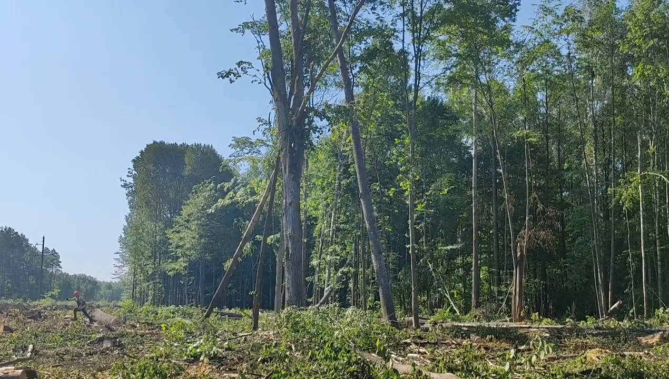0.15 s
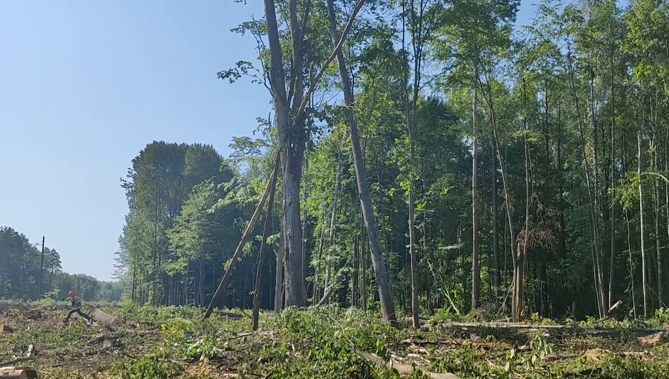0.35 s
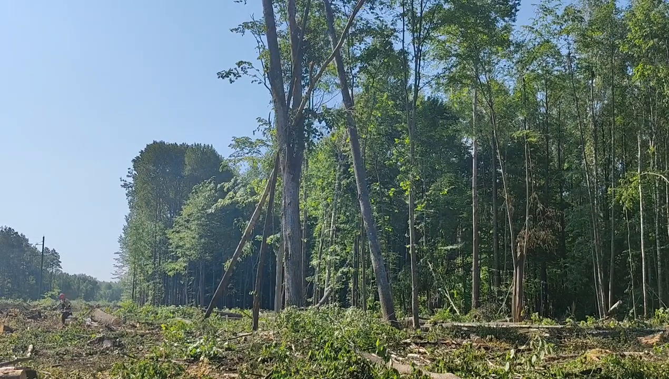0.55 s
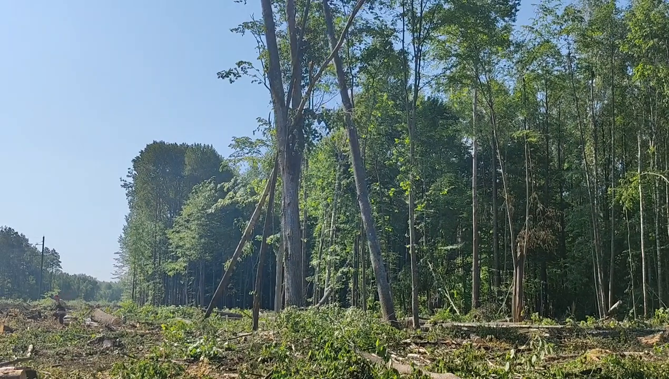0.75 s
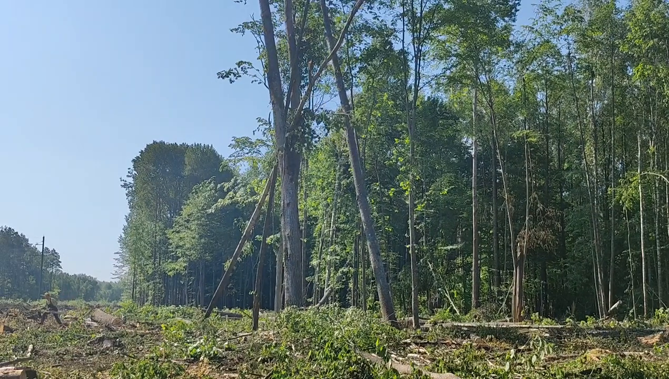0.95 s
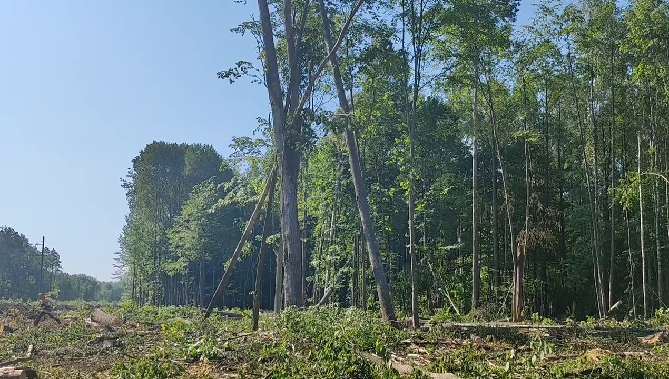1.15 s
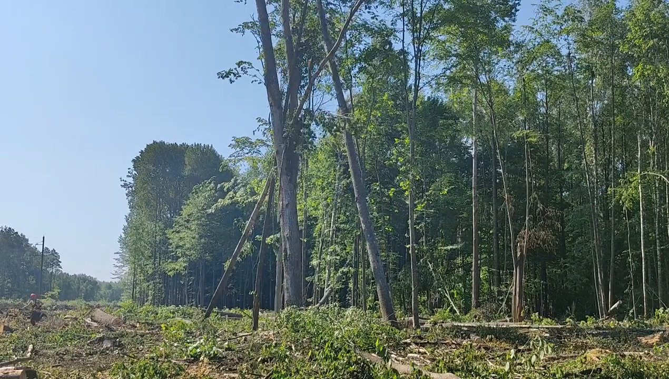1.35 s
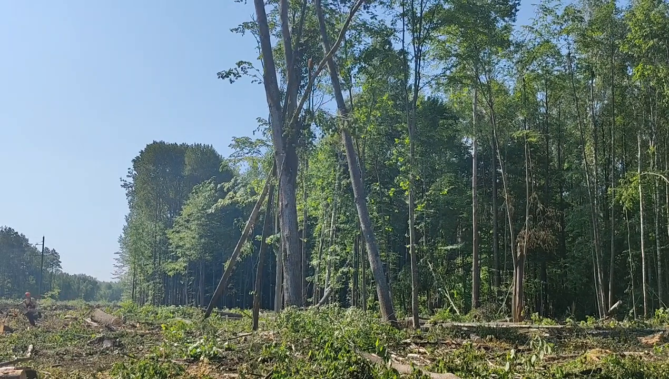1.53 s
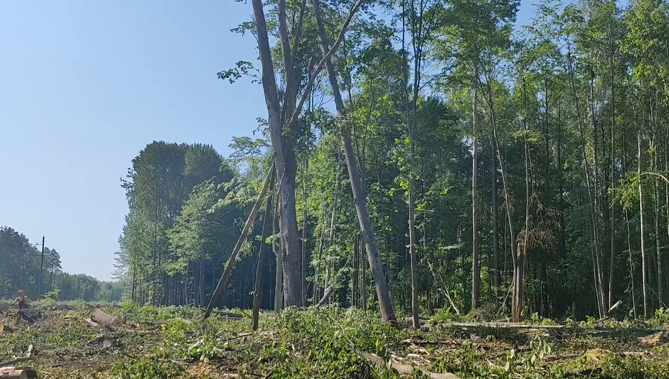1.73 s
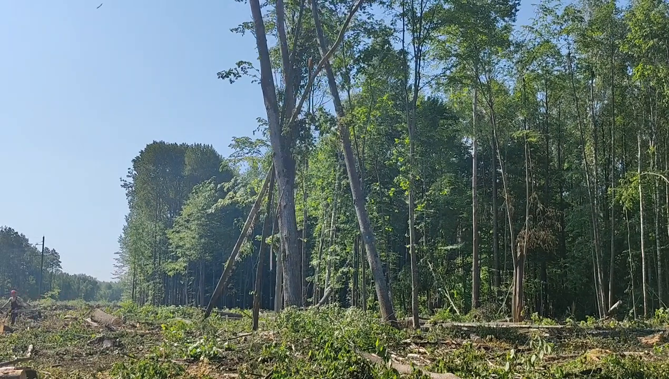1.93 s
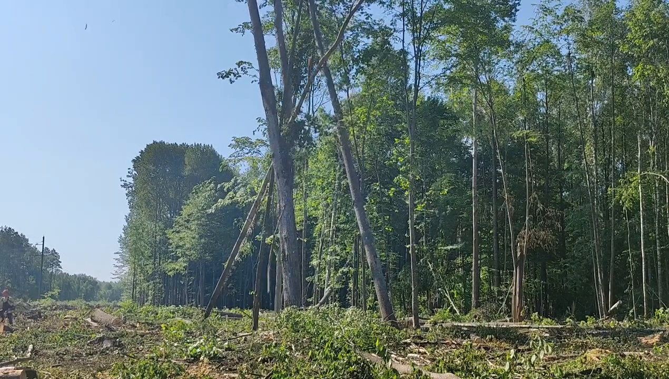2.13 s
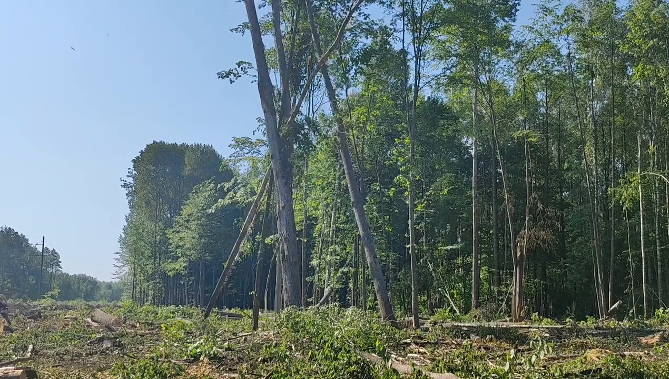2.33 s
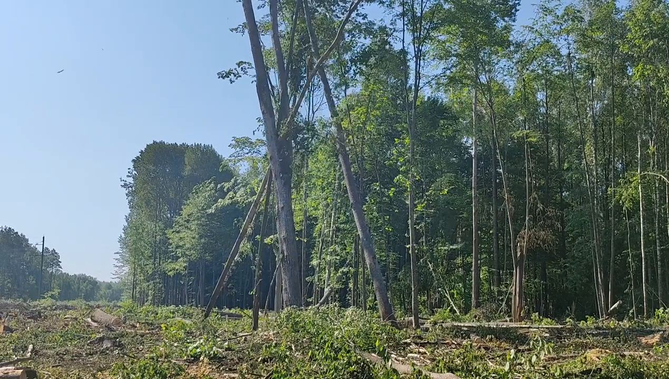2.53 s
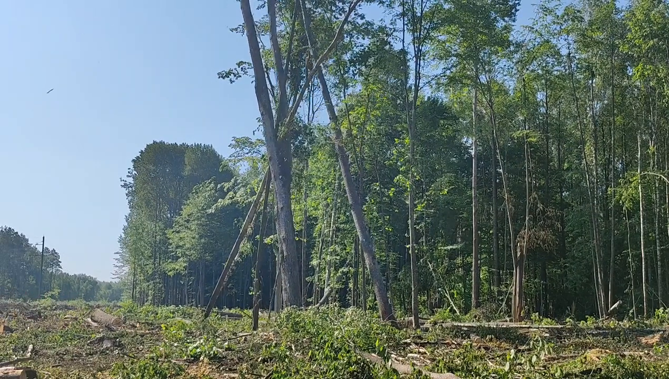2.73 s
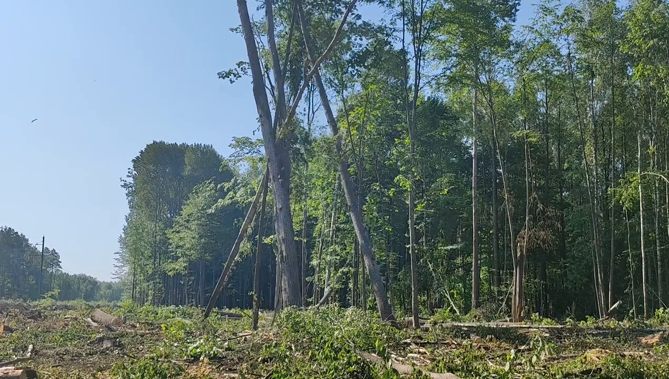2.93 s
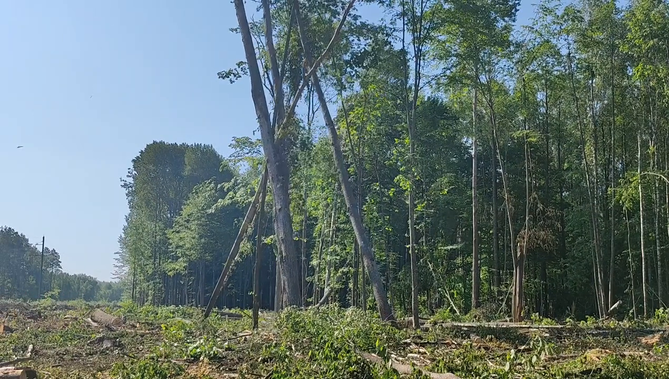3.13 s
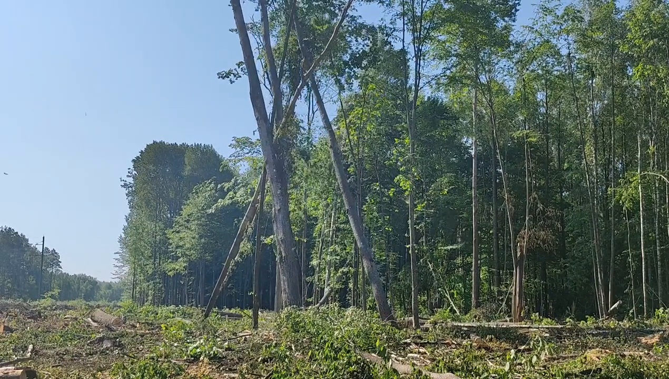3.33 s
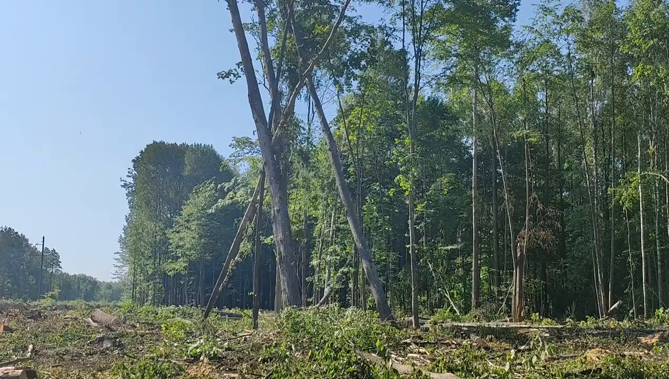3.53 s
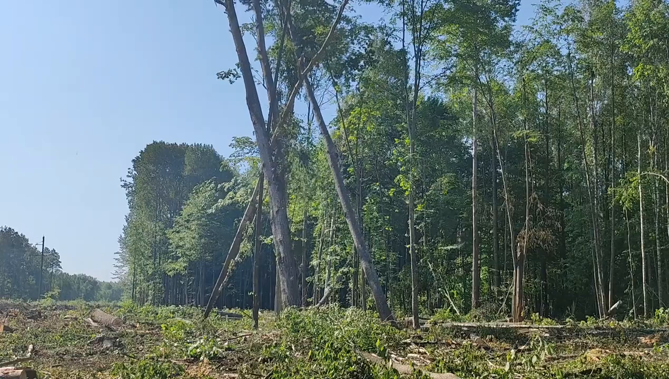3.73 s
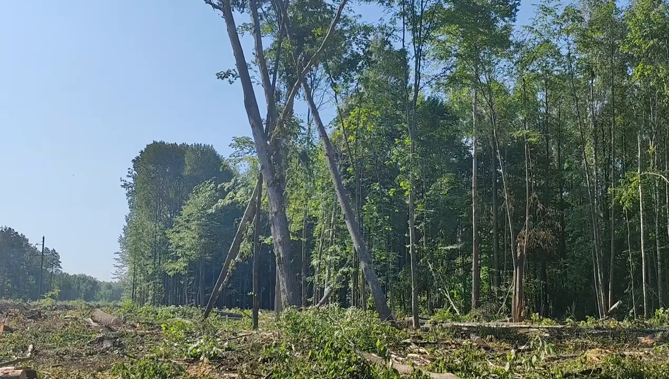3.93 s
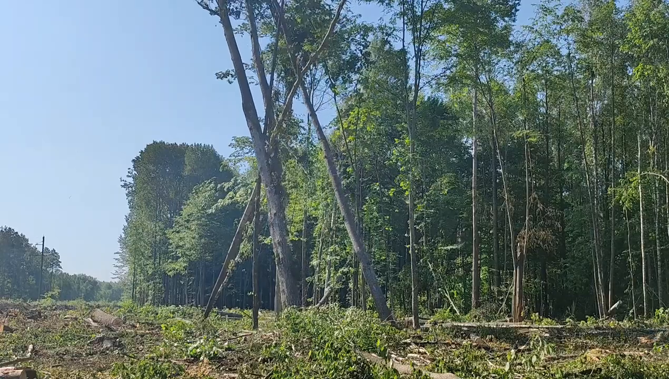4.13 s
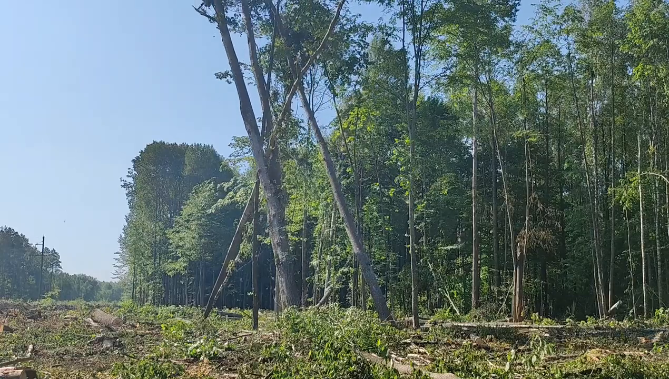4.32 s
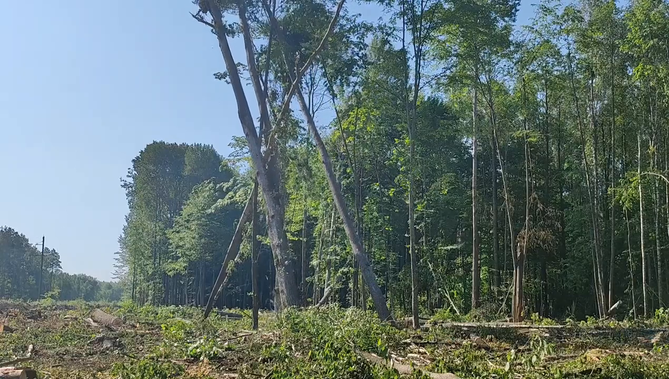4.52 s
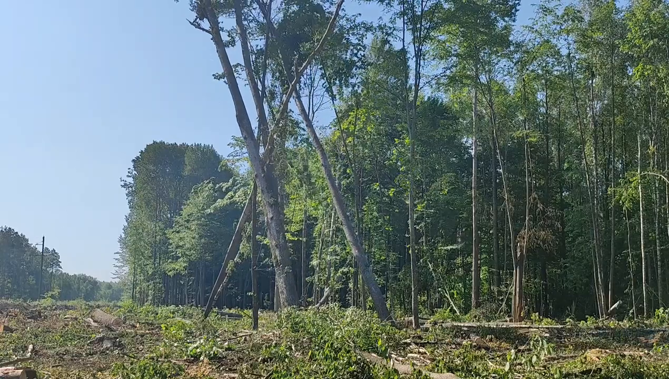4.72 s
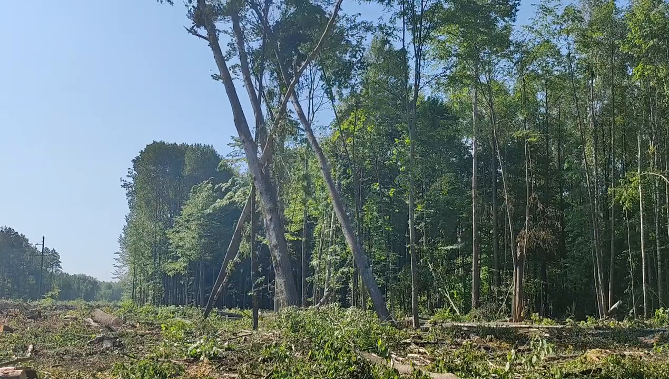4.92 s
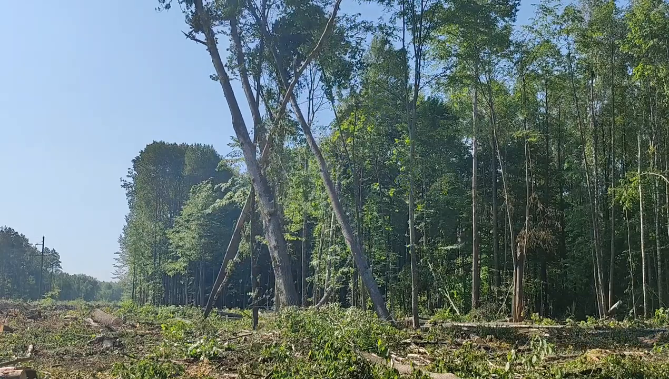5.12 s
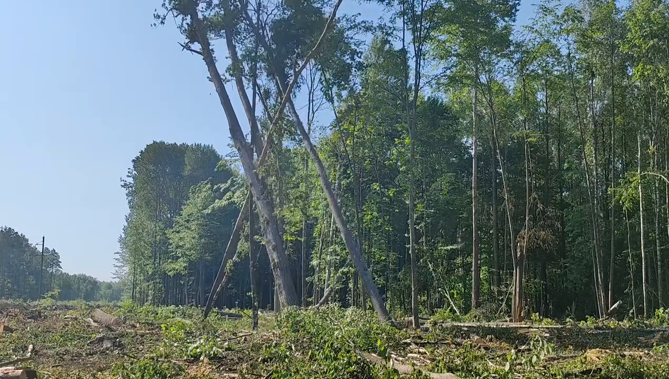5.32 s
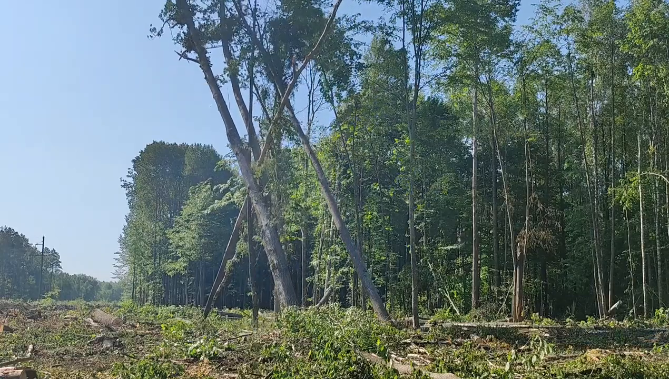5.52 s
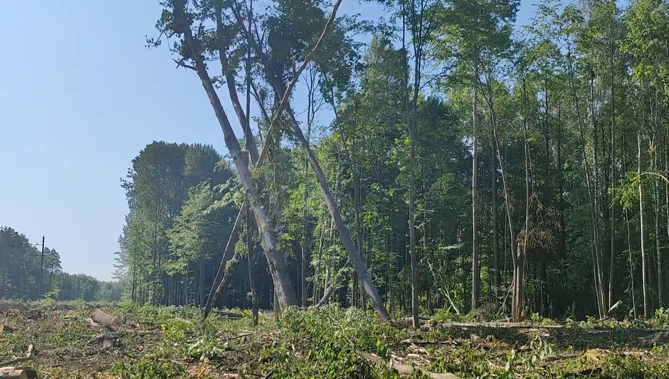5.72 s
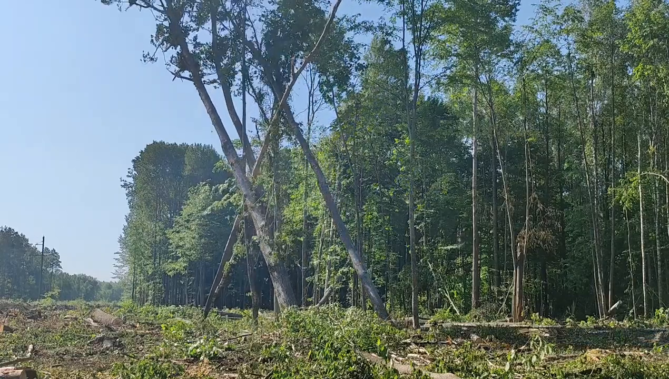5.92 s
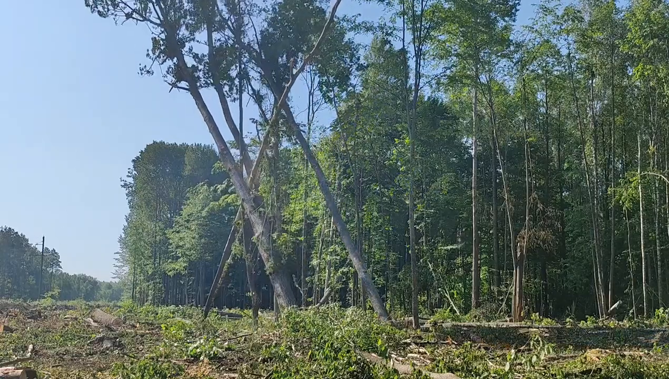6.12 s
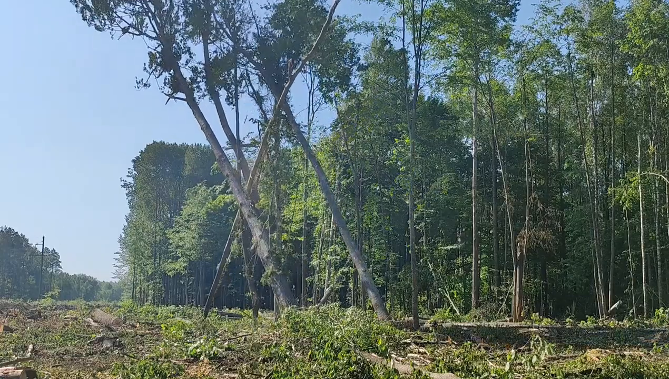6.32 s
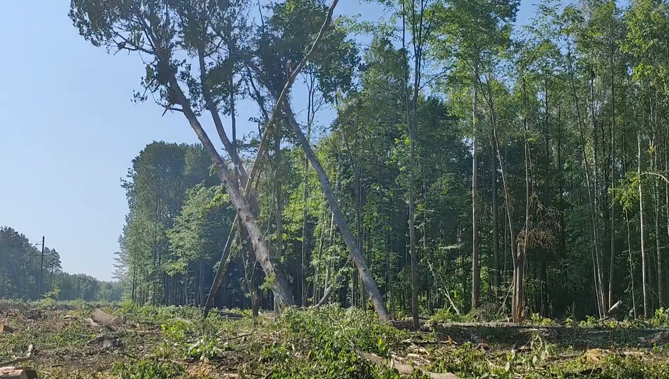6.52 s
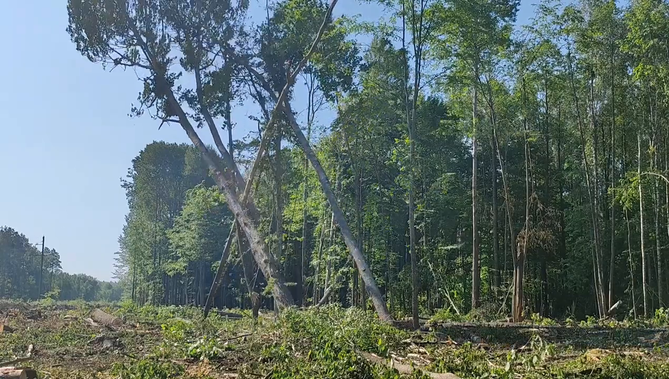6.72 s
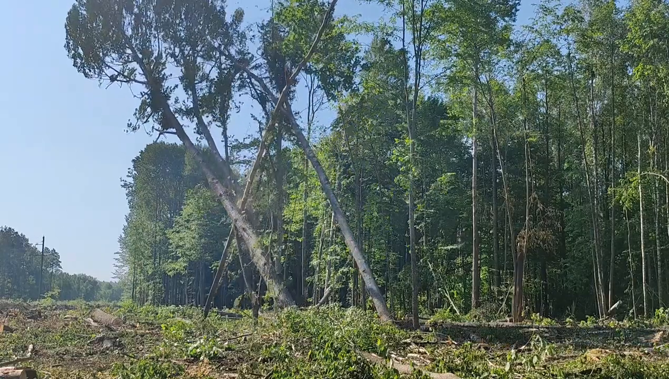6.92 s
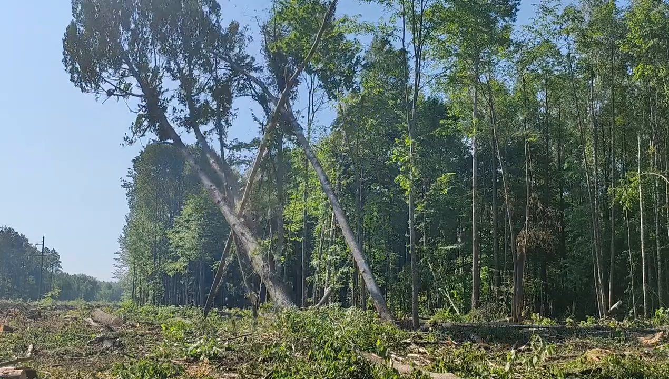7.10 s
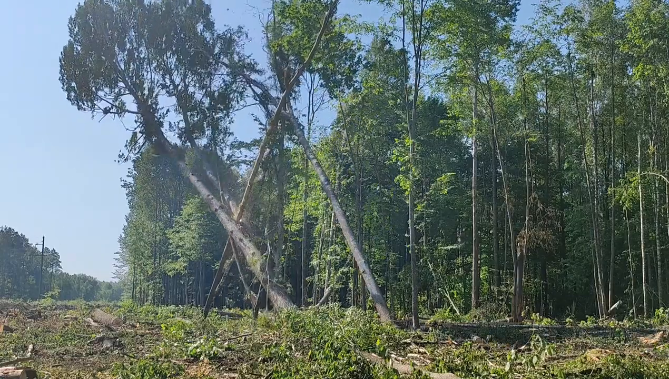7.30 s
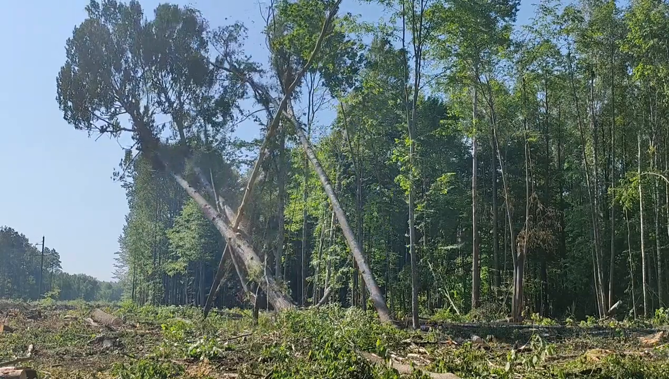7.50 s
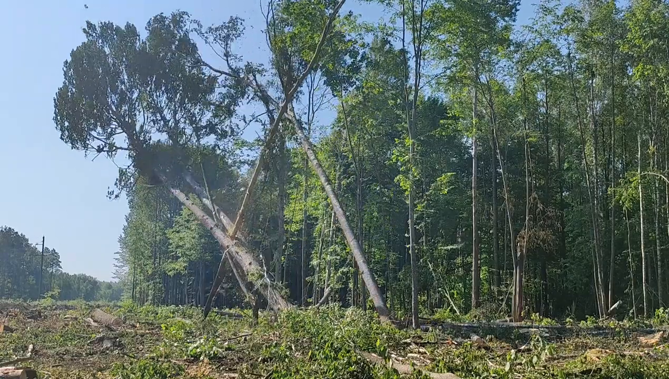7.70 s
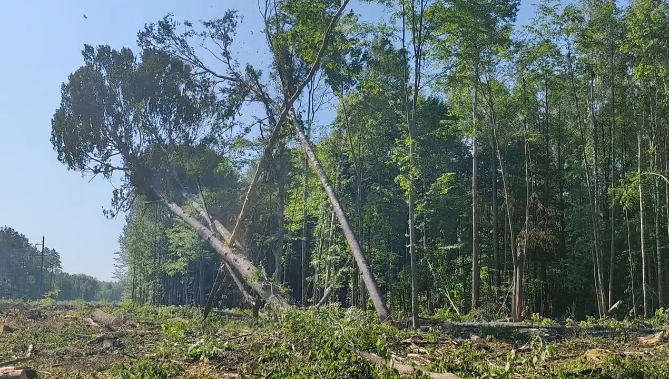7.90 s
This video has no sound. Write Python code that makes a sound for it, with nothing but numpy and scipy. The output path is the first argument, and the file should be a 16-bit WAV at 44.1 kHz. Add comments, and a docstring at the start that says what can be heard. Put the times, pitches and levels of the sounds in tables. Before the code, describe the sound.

A cut tree tips in a forest clearing, heard from some distance in stereo and slowed to half speed at natural pitch, so sounds stutter and most breaks come twice. At 0 s there is a soft low knock over very faint leaves. Small dry snaps come at about 1.1 s and 2.2 s, with dull knocks between. From 2.65 s cracks and hollow woody knocks get stronger, leaves begin to rustle, and a hard snap lands at 3.5 s. From 3.6 to 5.3 s snaps, splintering and low groaning wood follow closely. The loudest, sharpest crack hits at 5.5 s. Leaves and twigs then rush more, with strong snaps near 6.1, 6.6, 6.95 and 7.55 s. Knocks, groans and a slight deep rumble swell towards 8 s, where it stops mid-fall. Brief echoes from the wood edge follow the breaks.

```python
"""First a soft low knock over faint leaves, then snaps of uneven loudness, the loudest at about 5.5 s: a cut tree
tips in a forest clearing and breaks through its neighbours, some way from a two-port microphone.
Snaps are short rings with splintering noise; knocks, low thuds and a few high rings of snapping wood are
rings with a rattle; leaves, groaning wood and rumble are coloured noise; the wood edge echoes the breaks.
It plays at half speed without a change of pitch: the player keeps stepping back, so most sounds come twice."""
import sys
import numpy as np
from scipy import signal
from scipy.fft import rfft, irfft, next_fast_len
from scipy.io import wavfile
from scipy.ndimage import uniform_filter1d

SR = 44100
rng = np.random.default_rng(int(sys.argv[2]) if len(sys.argv) > 2 else 0)


def unload_audio(sound):
    """Save the sound as a 16-bit wav file, at the path given as the first command line argument."""
    columns = np.transpose(np.atleast_2d(sound))
    # keep every value between -1 and 1, then stretch to whole-number steps
    steps = np.round(np.clip(columns, -1, 1) * 32767)
    wavfile.write(sys.argv[1], SR, steps.astype(np.int16))


N = 355093
LIVE = N // 2 + SR // 4  # samples of the fall at true speed

# Snapping wood, one hearing of each; levels are before the microphone ports:
# start_s (as played), level_db (peak), pitch_hz, splintering_ms, splinters_db (over the ring),
# brightness_db_per_octave (of the splinters)
SNAPS = [(0.979, -37.5, 1850, 80, 6, 12), (1.1064, -22, 1700, 3.6, -7, -3),
         (1.1277, -25.5, 1840, 2.2, -3, -9), (1.708, -36, 2810.0, 27, 2, 11.5),
         (1.938, -32, 2100, 1.9, -16, -8), (2.063, -29.5, 6950, 3.7, 5, 17.5),
         (2.1662, -22.5, 1730, 6.1, -5, -5), (2.1855, -30, 1780, 7.5, 6, 2),
         (2.529, -29.5, 1410, 12, 6, 7.5), (2.657, -28.5, 2700, 30, 9, 6), (2.6654, -17.5, 1960, 16, 1, 4),
         (2.7532, -21.5, 2270, 20, 0, 6), (2.782, -24, 2260, 47, 1.5, 4.5), (2.797, -30, 2000, 48, 10, 3),
         (3.0982, -32, 3488.0, 14, 1, 5), (3.2248, -29.5, 1820, 11, -5, -5),
         (3.255, -28.5, 4970, 9.1, -11, 15), (3.4816, -9.5, 1750, 2.4, -6.5, -1.5),
         (3.4892, -16.5, 1840, 4.9, -6, 0.5), (3.5144, -29, 1960, 3.4, 14, 7),
         (3.6195, -23, 1780, 13, 4, 1.5), (3.644, -22.5, 2120, 4.2, 1, -1.5),
         (3.8203, -24, 1760, 1.5, -6, -5), (3.8351, -19.5, 2000, 8.3, 0, -5),
         (3.9568, -21.5, 2050, 1.5, 0, 3), (4.0512, -24.5, 3300, 21, 4, 7),
         (4.184, -25.5, 2670, 4.2, -19, 6), (4.2223, -25, 2050, 13, -9, 6), (4.328, -20, 1110, 34, 9, 2.5),
         (4.4192, -20.5, 4020, 9.5, 5, 5.5), (4.4255, -23, 1930, 5.6, -3, 9),
         (4.4436, -15, 2110, 3.1, -3, 1.5), (4.4563, -27, 2180, 4.4, 6, 0), (4.6601, -27, 1760, 14, -1, 4),
         (4.777, -17.5, 3050, 4.6, -9, 4), (4.809, -24.5, 4870, 13, -2, 5.5),
         (4.8263, -22, 2196.0, 2.8, -19, 4), (5.004, -25, 1560, 2.8, 14, 6),
         (5.0546, -24, 1480, 6.1, 8, -0.5), (5.2799, -24, 1650, 29, 17, 5.5),
         (5.5135, -23, 2940, 5.5, -8, -1), (5.5365, -8.5, 3000, 6.7, -9, 9),
         (5.5378, -2.5, 1990, 2.6, -8.5, 14.5), (5.5407, -8.5, 1600, 8.9, -15, 28),
         (5.603, -26, 3080, 14, -3, 0), (5.607, -17, 1890, 15, 0, -13), (5.902, -22, 1310, 5.4, -5, 0),
         (5.9945, -22, 2600, 8, 2, 0), (6.0856, -19, 1740, 5.6, 1, 0.5),
         (6.1076, -10.5, 2300, 5.2, -3.5, 6), (6.1971, -15, 3350, 35, 12, 5.5),
         (6.209, -17.5, 1220, 10, -4, -1), (6.214, -19, 1620, 7.1, -14, -3),
         (6.3586, -21, 1500, 6.4, 11, 1), (6.564, -13.5, 3160, 11, 0, 3), (6.5703, -26, 2300, 28, -4, 21),
         (6.614, -19, 2160, 4.5, -6, -7), (6.803, -26.5, 1600, 17, -1, -3),
         (6.9416, -11, 2170, 4.9, 10.5, 3.5), (6.948, -27, 1560, 21, 13, 1),
         (7.0619, -20.5, 1850, 8.8, 1, 1), (7.179, -20.5, 1430, 7.3, 14, 1),
         (7.41, -24.5, 1870, 2.2, -28, -11), (7.418, -25, 2090, 7.9, -8, -4),
         (7.5583, -13.5, 2120, 3.8, 11, 8.5), (7.5647, -21.5, 2150, 16, 16, 3),
         (7.6675, -15, 1830, 3.9, 4, -1), (7.785, -23, 2390, 8.8, -7, 11), (7.927, -32, 1510, 6.2, -2, -8),
         (8.0, -24.5, 1460, 6.8, 0, -6)]


def snaps():
    """Every snapping branch, each by two slightly different paths."""
    out = np.zeros((2, LIVE))
    chances = rng.standard_normal((len(SNAPS), 2, 2, 3000))
    for (start_s, level_db, *shape), chance in zip(SNAPS, chances):
        add(out, start_s, level_db, snap(*shape, chance))
    return out


# Basic tone of the splinters, before each snap's own brightness: pitch_hz, level_db (relative)
CRACK = [(290, -36), (500, 24.5), (860, 20), (1170, 18), (1500, 21), (1920, 22.5), (2470, 12), (3050, 17),
         (3930, 8), (5260, 5), (6960, -7), (7840, -3.5), (10600, -17.5), (12000, -43), (22000, -120)]


def snap(hz, ms, splinter_db, bright_db, chance):
    """The branch rings for a few cycles as it parts with a sharp crack; clumps of splinters die away behind."""
    t_ms = np.arange(chance.shape[-1]) / SR * 1000
    noise, luck = chance

    def splinter_tone(f):
        tilt_db = bright_db * np.log2(np.maximum(f, 600) / 2000)
        return gain_of(read(CRACK, f) + tilt_db)

    hiss = colour(noise, splinter_tone)
    clumps = gain_of(3 * evened(uniform_filter1d(luck[0], size=50)))
    crack = 0.4 * np.exp(-t_ms / 4.0)
    onset = np.minimum(t_ms / (0.25 + 0.059 * ms), 1)
    splinters = hiss * onset * (crack + clumps * gain_of(-11.0 * t_ms / ms))
    cycles_ms = 1000 * (4.54 + 0.093 * ms) / hz  # a slower break rings more cycles
    head = peaked(packet(hz, cycles_ms, 0.0073, luck[:, 0], size=len(t_ms)))
    push = peaked(packet(122.0, 16.0, 0.44, np.zeros(2), size=len(t_ms)))  # the whole stem jolts
    return head + gain_of(splinter_db) * peaked(splinters) + 0.037 * push


# Knocks, low thuds and a few high rings of snapping wood, one hearing of each;
# levels are before the microphone ports:
# start_s (as played), level_db (peak), pitch_hz (nominal), length_ms (nominal)
KNOCKS = [(0.0022, -36.5, 253, 25), (0.176, -44, 91, 41), (0.523, -38.5, 427, 24), (0.766, -37, 251, 15),
          (1.1072, -17, 724, 1.1), (1.109, -43.5, 107, 51), (1.134, -36.5, 238, 24), (1.4399, -41, 250, 42),
          (1.561, -38.5, 450, 23), (1.635, -33, 420, 7.3), (1.6971, -34, 338, 6.3), (1.706, -37, 554, 9.7),
          (1.7073, -29.5, 287, 16), (1.716, -36, 181, 22), (1.7406, -43, 272, 14), (2.0452, -38, 724, 33),
          (2.1654, -38, 327, 12), (2.2013, -38, 223, 23), (2.5245, -36, 623, 15), (2.6552, -24, 406, 43),
          (2.656, -30, 840, 16), (2.666, -31.5, 102, 8.8), (2.7496, -16.5, 376, 14.7),
          (2.7465, -23, 734, 28), (2.763, -25.5, 576, 23), (2.79, -27, 378, 25), (2.777, -30.5, 714, 22),
          (3.222, -20, 393, 22), (3.4836, -25, 579, 27), (3.572, -32.5, 283, 28), (3.6195, -29.5, 1750, 13),
          (3.743, -20, 295, 22), (3.753, -37, 277, 22), (3.8274, -24, 233, 26), (4.2319, -30.5, 383, 39),
          (4.313, -26, 330, 19), (4.329, -35.5, 757, 40), (4.341, -33, 1050, 18), (4.6533, -16, 304, 10.8),
          (4.661, -22, 308, 9.4), (4.674, -28, 284, 35), (4.734, -32.5, 264, 45), (4.719, -47.5, 101, 37),
          (4.783, -27, 244, 23), (4.848, -28.5, 336, 13), (4.938, -28.5, 487, 21), (5.064, -36.5, 95, 26),
          (5.279, -30, 417, 26), (5.287, -30.5, 254, 43), (5.45, -33, 240, 25), (5.5135, -27, 1590, 4.9),
          (5.5359, -11, 790, 8.2), (5.537, -22, 4150, 5.7), (5.542, -25.5, 424, 21),
          (5.548, -26.5, 104, 6.1), (5.616, -23, 582, 19), (5.622, -35, 1720, 10),
          (5.7731, -25.5, 305, 11.4), (5.9885, -19, 1980, 10.5), (5.992, -25, 665, 8),
          (6.085, -21.5, 640, 8.8), (6.106, -24, 686, 13), (6.138, -20.5, 258, 16), (6.148, -23.5, 850, 14),
          (6.15, -25, 499, 13), (6.5605, -18.5, 674, 7.5), (6.86, -28.5, 215, 12), (6.803, -30, 338, 25),
          (6.9425, -20.5, 400, 3.2), (6.942, -21.5, 800, 4.9), (6.954, -33, 107, 30), (7.254, -34, 228, 20),
          (7.2834, -24, 440, 14), (7.34, -34.5, 101, 59), (7.4215, -20, 549, 20), (7.426, -19, 410, 13),
          (7.423, -26.5, 754, 12), (7.442, -25, 248, 27), (7.5575, -24.5, 754, 8.9),
          (7.559, -28, 1120, 6.6), (7.666, -44, 825, 6.4), (7.7, -26, 306, 22), (7.708, -22, 495, 7.6),
          (7.745, -25.5, 172.5, 49), (7.791, -27.5, 186, 29), (7.76, -50, 90, 74), (7.776, -34, 440, 14),
          (7.9061, -23.5, 210, 28), (7.9247, -19, 330, 13), (7.926, -26, 715, 13)]


def knocks():
    """Every knock, low thud and high ring of snapping wood, each by two slightly different paths."""
    out = np.zeros((2, LIVE))
    chances = rng.standard_normal((len(KNOCKS), 2, 7000))
    for (start_s, level_db, hz, ms), chance in zip(KNOCKS, chances):
        add(out, start_s, level_db, knock(hz, ms, chance))
    return out


def knock(hz, ms, chance):
    """The wood rings at a main tone, one above and one below for a few cycles; a dull rattle follows."""
    t_ms = np.arange(chance.shape[-1]) / SR * 1000
    size = len(t_ms)
    wobble = evened(uniform_filter1d(uniform_filter1d(chance[0], size=150), size=150))
    uneven = gain_of(0.043 * ms * wobble)  # a long ring stumbles
    main = peaked(packet(1.0436 * hz, 1.034 * ms, 0.18, chance[:, 0], size))
    above = peaked(packet(1.602 * hz, 1.16 * ms, 0.5, chance[:, 1], size))
    below = peaked(packet(0.55 * hz, 1.0 * ms, 0.16, chance[:, 2], size))
    shaking = chance * np.minimum(t_ms / 4, 1) * gain_of(-8.5 * t_ms / ms)
    rattle = ring(ring(shaking, hz, 0.4 * hz), hz, 0.6 * hz)
    rattle_gain = 0.17 + 0.0032 * ms
    return (main + 0.098 * above) * uneven + 0.059 * below + rattle_gain * peaked(rattle)


def packet(hz, ms, sag, turn, size):
    """A few cycles that swell quickly, sag in pitch and die; each path has its own phase."""
    u = np.arange(size) / SR * 1000 / ms
    cycles = hz * ms / 1000 * (u - sag * np.minimum(u, 2) ** 2 / 4)
    swell = u ** 1.4 * np.exp(-6.2 * u)
    return swell * np.sin(2 * np.pi * (cycles + turn[:, None]))


# Tone of leaves and twigs: pitch_hz, level_db (relative, per Hz)
LEAVES = [(470, -4), (800, -2.5), (1090, -9.5), (1260, -7.5), (1690, 1.5), (2720, -2), (3080, 0.5),
          (4140, -6), (5130, -4.5), (7210, -12), (8070, -7.5), (8840, -13), (11000, -15), (11600, -40),
          (12000, -85), (22000, -120)]
# The crown through the fall: time_s (as played), leaves_db, groaning_wood_db
FALL = [(0.0, -49.5, -45.5), (0.33, -49.5, -54), (1.03, -48.5, -46.5), (1.95, -48, -49), (2.62, -47, -44.5),
        (2.78, -42.5, -42), (3.76, -41.5, -34), (4.19, -40, -38.5), (4.5, -40, -38.5), (5.2, -41, -38),
        (5.78, -35.5, -34.5), (6.1, -37, -33), (6.39, -37.5, -34.5), (7.04, -38.5, -35), (7.31, -39, -36),
        (7.6, -42, -33.5), (7.73, -35, -32.5), (8.05, -38, -36)]
# Twigs after each snap: level for a 0 dB snap, share of the snap's dB that carries over,
# rise (s at true speed), decay in lengths of the snap
SHOWER_DB, SHOWER_SHARE, SHOWER_RISE_S, SHOWER_LENGTHS = -40.5, 0.78, 0.0091, 0.63


def leaves_and_twigs():
    """Leaves rush as noise with small ticks in it; every snap sets off a shower of crackling twigs."""
    rush = wash(LEAVES, patchy_db=0.7, flicker_db=0.9)
    leaves = 0.9 * rush + 0.33 * grains(LEAVES, per_s=600, spread_db=4.1)
    twigs = grains(LEAVES, per_s=900, spread_db=3.5)
    shower = shaken(SNAPS, SHOWER_DB, SHOWER_SHARE, SHOWER_RISE_S, SHOWER_LENGTHS)
    return leaves * level(FALL, axis=1) + twigs * np.sqrt(shower)


# Tone of the groaning wood: pitch_hz, level_db (relative, per Hz)
WOOD = [(71, -15.5), (120, -12), (245, 3.5), (360, 1), (424, 3), (519, -5), (686, -5.5), (1200, -18.5),
        (1560, -12.5), (2640, -120)]
# Groaning after each knock, settings as for the shower of twigs
GROAN_DB, GROAN_SHARE, GROAN_RISE_S, GROAN_LENGTHS = -30, 0.55, 0.0044, 0.36


def groaning_wood():
    """Wood groans as low, patchy noise, and more after each knock."""
    wood = wash(WOOD, patchy_db=2.2, flicker_db=1.7)
    groan = shaken(KNOCKS, GROAN_DB, GROAN_SHARE, GROAN_RISE_S, GROAN_LENGTHS)
    return wood * np.sqrt(level(FALL, axis=2) ** 2 + groan)  # steady and shaken powers add


# Tone of the rumble: pitch_hz, level_db (relative, per Hz)
RUMBLE = [(12, -55), (28, -38), (80, 14), (140, -1), (230, -26), (400, -120)]
# Loudness of the rumble through the fall: time_s (as played), level_db
RUMBLING = [(0, -71), (0.6, -67), (2.4, -79), (2.8, -65), (3.7, -60), (4.7, -63), (5.3, -69), (6.4, -57.5),
            (7.2, -52), (8.05, -43)]


def air_and_ground():
    """Air and ground rumble as very low noise of uneven strength."""
    return wash(RUMBLE, patchy_db=5.0, flicker_db=5.0) * level(RUMBLING, axis=1)


# How long echoes last in the wood edge: pitch_hz, fade_s (time to fall by 60 dB)
FOREST = [(100, 0.57), (500, 0.12), (2000, 0.17), (6000, 0.31), (12000, 0.071)]


def forest(x):
    """Sparse echoes off trunks, one in every 20 samples, each band dying at its own speed."""
    taps = np.zeros((2, SR // 2))
    slots = np.arange(300, SR // 2 - 20, 20)
    at = slots + rng.integers(0, 20, (2, len(slots)))
    np.put_along_axis(taps, at, rng.choice([-1.0, 1.0], at.shape), 1)
    hz, t, bands = signal.stft(taps, SR, nperseg=256)
    fade_s = np.maximum(read(FOREST, hz), 0.03)[:, None]
    tail = signal.istft(bands * gain_of(-60 * t / fade_s), SR, nperseg=256)[1]
    return signal.fftconvolve(x[None], tail / np.linalg.norm(tail[0]), axes=1)[:, :LIVE]


# The microphone's port pair: pitch_hz, side_db (over mid), tied_share (of side, 0 to 1), phase_rad (of tied side)
PORTS = [(90, -16.5, 0.12, -13), (266, -23, 0.2, -2), (450, -14.5, 1, -2), (700, -8, 0.92, -2),
         (900, -2.5, 0.54, -2), (1145, 5, 0.71, -4.5), (1440, 1, 0.58, -6), (1870, -6, 0.68, -7),
         (2520, -1.5, 0.34, -8.5), (3000, 0, 0.79, -11), (4400, -1, 0.62, -11.5), (5900, 0, 0.16, -10.5),
         (8500, 0.2, 0.35, -14), (11100, 1, 0.26, -13.5)]


def ports(paths):
    """The first path is the mid; the side is partly that path turned in phase, partly the second path."""
    def share(f):
        return np.clip(read(PORTS, f, axis=2), 0, 1)

    def tied_response(f):
        return gain_of(read(PORTS, f)) * share(f) * np.exp(1j * read(PORTS, f, axis=3))

    def free_response(f):
        return gain_of(read(PORTS, f)) * np.sqrt(1 - share(f) ** 2)

    side = colour(paths[0], tied_response) + colour(paths[1], free_response)
    return np.array([paths[0] + side, paths[0] - side])


# How far the slow player jumps at each step: back_ms
STEPS_BACK = [52.24, 68.93, 48.53, 61.77, 62.4, 55.69, 52.43, 64.99, 65.26, 50.29, 61.04, 68.03, 62.45,
              62.0, 38.73, 72.15, 61.32, 60.41, 56.92, 64.54, 51.66, 61.41, 64.13, 52.74, 64.26, 49.8, 62.9,
              76.28, 55.56, 46.17, 65.03, 63.36, 54.6, 54.97, 68.3, 46.35, 77.28, 60.32, 55.42, 58.37,
              52.88, 59.46, 69.34, 52.56, 59.68, 63.85, 56.01, 58.1, 55.15, 66.8, 67.44, 49.07, 51.75,
              68.34, 59.77, 50.2, 68.3, 65.35, 53.51, 66.76, 53.02, 63.4, 57.14, 54.65, 67.62, 65.44, 40.86]
FIRST_STEP_S, STEP_EVERY_S, FADE_S = 0.0874, 0.11917, 0.008  # as played; FADE_S is the cross-fade


def steps():
    """Samples at which the player steps back, and how far behind it is before each and after the last."""
    back = np.round(np.array(STEPS_BACK) * SR / 1000).astype(int)
    at = np.round((FIRST_STEP_S + STEP_EVERY_S * np.arange(len(back))) * SR).astype(int)
    return at, np.r_[0, np.cumsum(back)]


def slowed(live):
    """Half speed: at each step the player fades over to a point a little earlier."""
    at, behind = steps()
    n = np.arange(N)
    nearest = np.searchsorted(at - STEP_EVERY_S * SR / 2, n) - 1
    k = np.clip(nearest, 0, len(at) - 1)
    over = np.clip((n - at[k]) / (FADE_S * SR) + 0.5, 0, 1)
    before = live[:, np.minimum(n - behind[k], LIVE - 1)]
    after = live[:, np.maximum(n - behind[k + 1], 0)]
    return (1 - over) * before + over * after


def add(mix, start_s, peak_db, sound):
    """Places a sound at the true-speed moment that is played at start_s."""
    at, behind = steps()
    n = round(start_s * SR)
    start = max(n - behind[np.searchsorted(at, n)], 0)
    part = mix[:, start:][:, :sound.shape[1]]
    part += (gain_of(peak_db) * peaked(sound))[:, :part.shape[1]]


def shaken(events, top_db, share, rise_s, lengths):
    """Power of a swell after each break; a longer break shakes longer."""
    out = np.zeros((1, LIVE))
    t = np.arange(SR // 3)[None] / SR
    for start_s, level_db, hz, ms, *rest in events:
        decay_s = lengths * ms / 1000
        swell = (1 - np.exp(-t / rise_s)) * np.exp(-t / decay_s)
        add(out, start_s, 2 * (top_db + share * level_db), swell)  # doubled dB gives power
    return out


def wash(spectrum, patchy_db, flicker_db):
    """Noise with drifting patches and flickers shared by all bands."""
    frames = LIVE // 128 + 6
    a, b, patches = rng.standard_normal((frames, 257, 2, 3)).T
    patches = uniform_filter1d(patches[0], size=6, axis=0)  # across pitch
    patches = evened(uniform_filter1d(patches, size=10, axis=1))  # across time
    flicker = evened(uniform_filter1d(rng.standard_normal(frames), size=3))
    bands = (a + 1j * b) * gain_of(patchy_db * patches + flicker_db * flicker)
    x = signal.istft(bands, nperseg=512, noverlap=384)[1]
    return evened(colour(x[:, :LIVE], lambda f: gain_of(read(spectrum, f))))


def grains(spectrum, per_s, spread_db):
    """Sparse ticks of very uneven size, as of twigs giving way; per_s is their mean rate at true speed."""
    size = gain_of(spread_db * np.minimum(rng.exponential(1, LIVE), 5))
    ticks = size * (rng.random(LIVE) < per_s / SR)
    puff = colour(rng.standard_normal((2, 2000)), lambda f: gain_of(read(spectrum, f)))[:, 800:1100]
    puff = puff * np.exp(-np.arange(300) / 230.0)
    return evened(signal.oaconvolve(ticks[None], puff)[:, :LIVE])


def ring(x, hz, width_hz):
    """A two-pole resonance."""
    r = np.exp(-np.pi * width_hz / SR)
    return signal.lfilter([1, 0, -1], [1, -2 * r * np.cos(2 * np.pi * hz / SR), r * r], x)


def colour(x, response):
    """Filters by a function of frequency."""
    size = next_fast_len(x.shape[-1] + 2048)
    spectrum = rfft(x, size) * response(np.fft.rfftfreq(size, 1 / SR))
    return irfft(spectrum, size)[..., :x.shape[-1]]


def read(points, hz, axis=1):
    """A table column on a log-frequency axis."""
    rows = np.array(points)
    return np.interp(np.log(hz + 1), np.log(rows[:, 0] + 1), rows[:, axis])


def level(rows, axis):
    """A table column as gain at true speed."""
    rows = np.array(rows)
    played_s = 2 * np.arange(LIVE) / SR
    return gain_of(np.interp(played_s, rows[:, 0], rows[:, axis]))


def gain_of(db):
    """dB to gain."""
    return 10 ** (np.asarray(db) / 20)


def evened(x):
    """Scales to rms 1."""
    return x / np.sqrt(np.mean(x ** 2) + 1e-20)


def peaked(x):
    """Scales each path to peak 1."""
    return x / abs(x).max(1, keepdims=True)


def scene():
    """The fall at true speed through the ports, then played slowly."""
    breaks = snaps() + knocks()
    echoes = gain_of(-10.5) * forest(breaks[0])
    crown = leaves_and_twigs() + groaning_wood() + air_and_ground()
    return slowed(ports(breaks + echoes + crown))


EDGE_HZ, CEILING = 12150, 0.97  # top of the band; level that peaks bend towards


def record(dry):
    """The loudest peaks are rounded off softly; then a filter removes the treble above the band edge."""
    soft = CEILING * np.tanh(dry / CEILING)
    low_pass = signal.firwin(301, EDGE_HZ, window=("kaiser", 9), fs=SR)
    return signal.oaconvolve(soft, low_pass[None], "same")


dry = scene()
out = record(dry)
unload_audio(out)
```